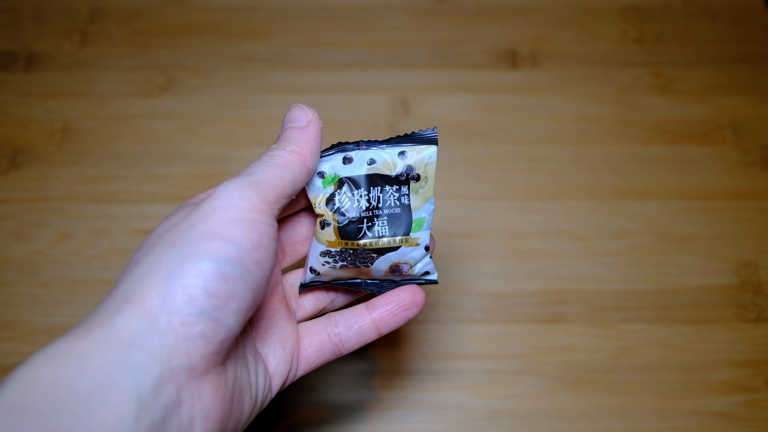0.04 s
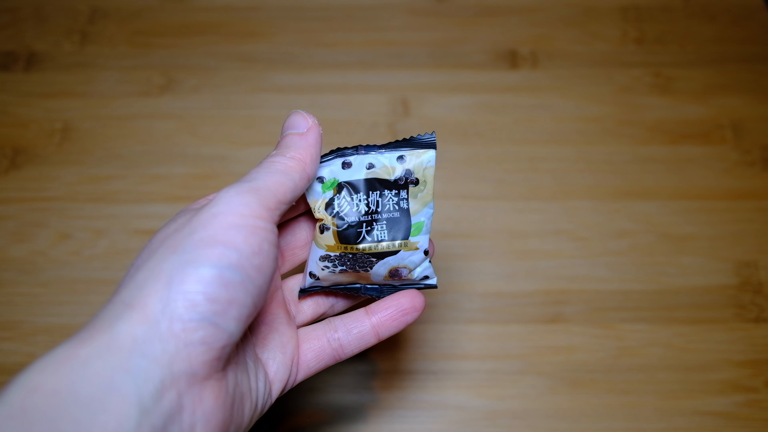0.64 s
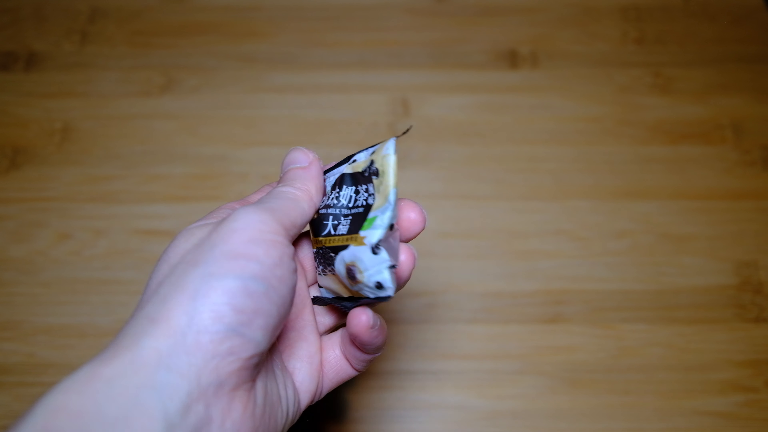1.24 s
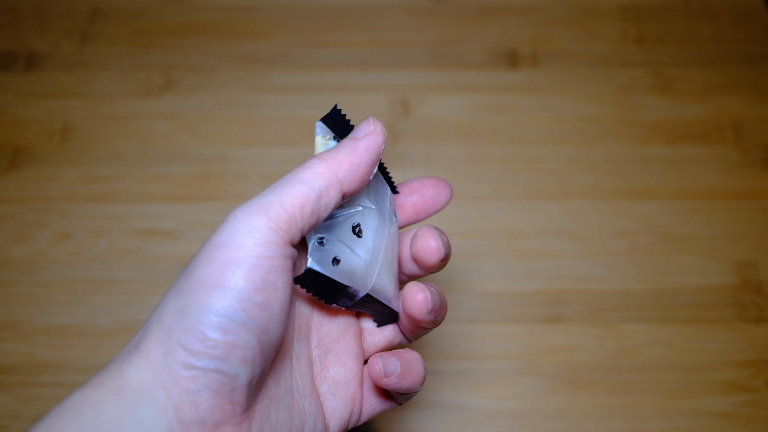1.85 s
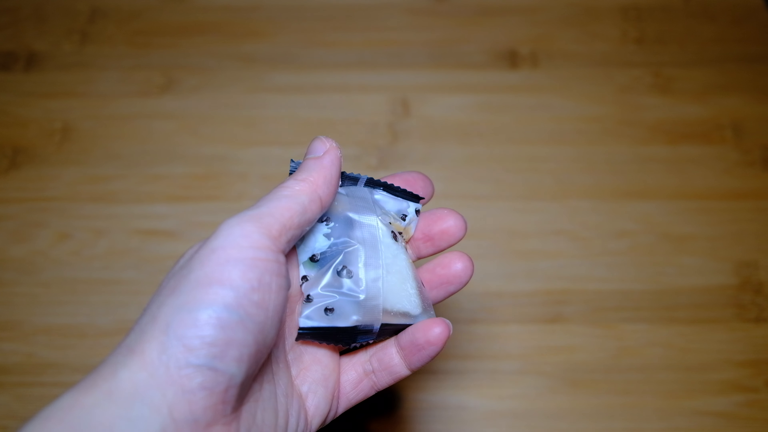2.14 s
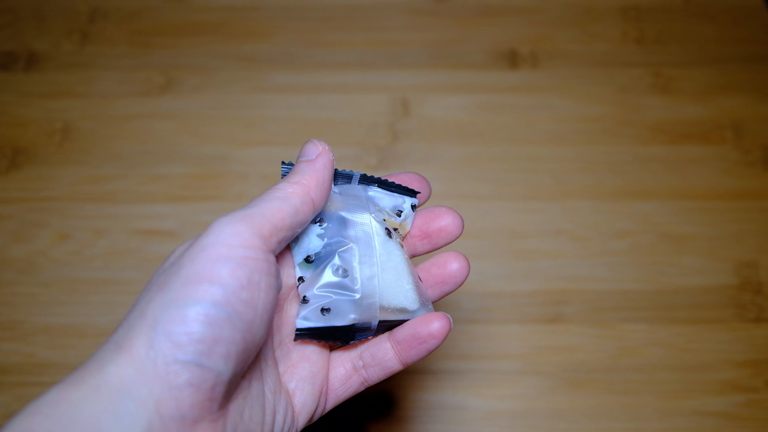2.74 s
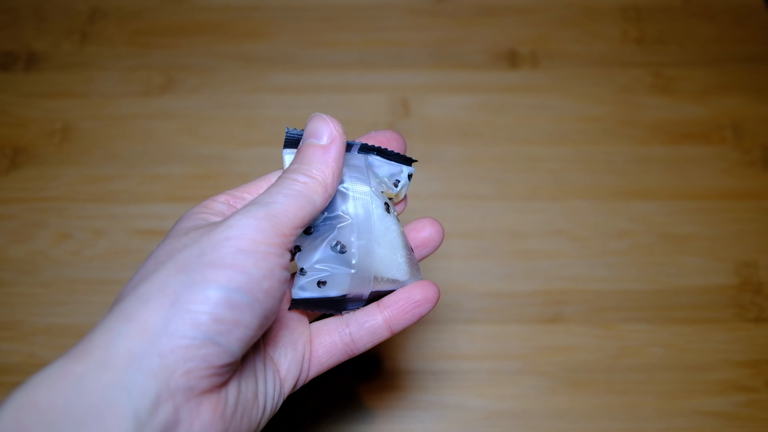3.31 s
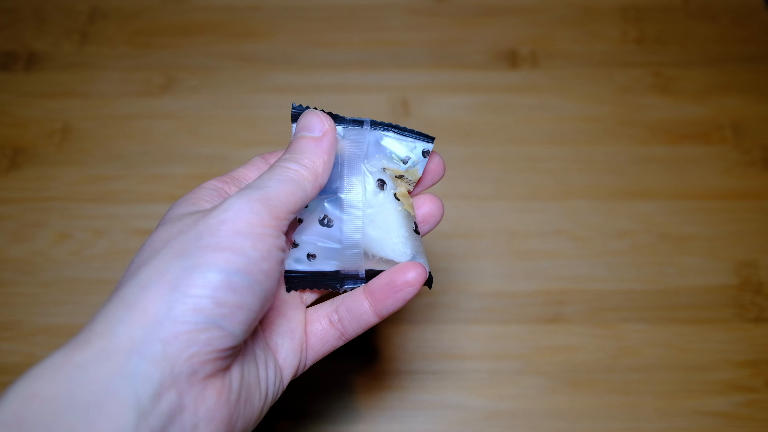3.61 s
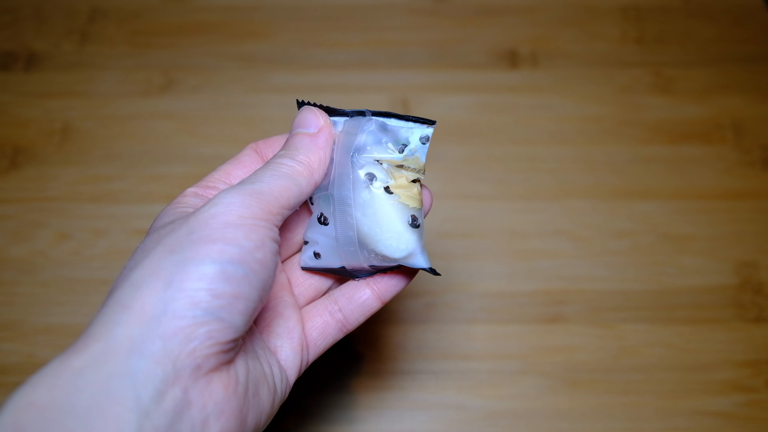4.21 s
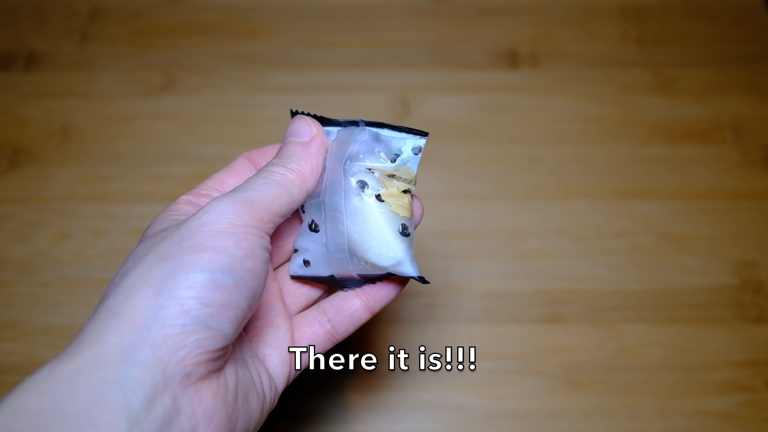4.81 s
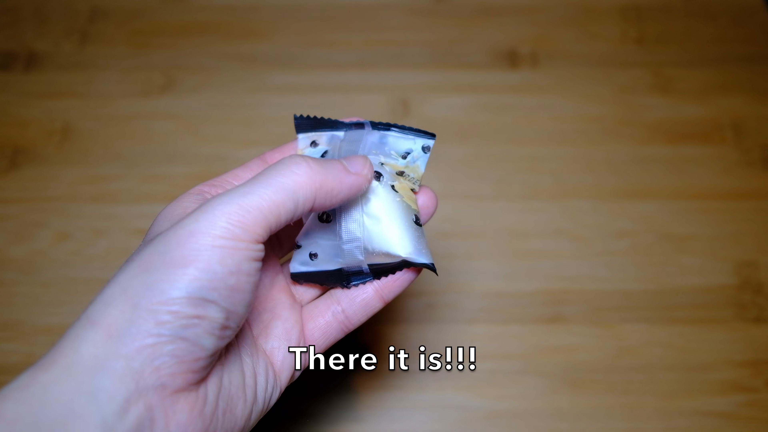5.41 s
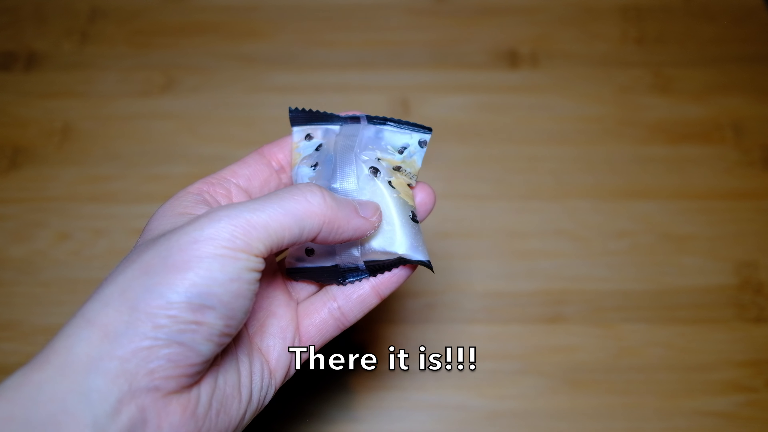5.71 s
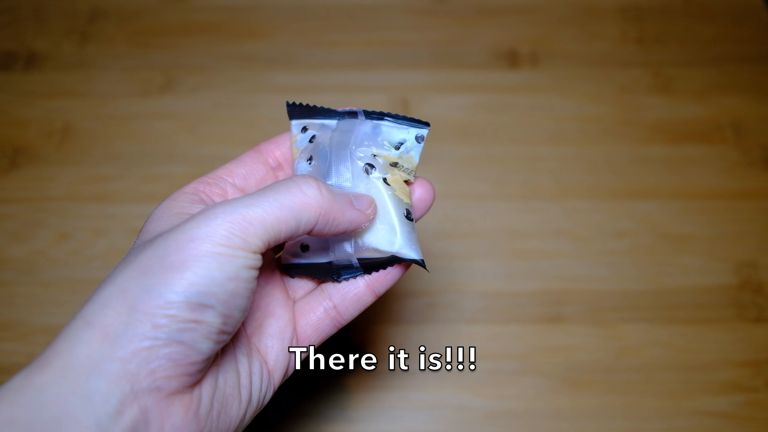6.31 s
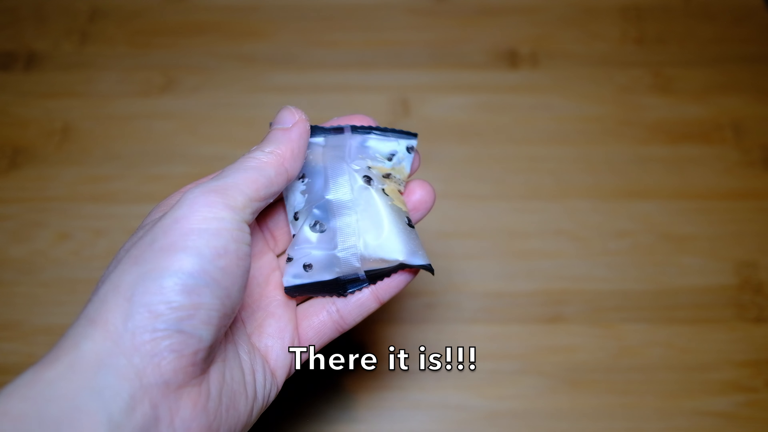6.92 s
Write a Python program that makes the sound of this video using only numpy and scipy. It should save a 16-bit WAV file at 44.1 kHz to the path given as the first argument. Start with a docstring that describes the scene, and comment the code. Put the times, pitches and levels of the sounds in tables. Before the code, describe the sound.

A small sealed plastic snack wrapper crackles and rustles in short spurts as a hand turns and presses it in a quiet room.

```python
"""A low hum and the faint noise of a small, quiet room; then, close to the microphone, plastic crackles.
A hand turns over a small sealed snack wrapper and presses it. Creases in the stiff film snap through
one by one, each briefly ringing a panel of film and the air-filled pouch. Squeezes set off runs of
smaller creases, finger strokes rustle over the film, and the near walls answer with short echoes."""
import sys
import numpy as np
from scipy import signal
from scipy.fft import rfft, irfft
from scipy.io import wavfile

SR = 44100
rng = np.random.default_rng(int(sys.argv[2]) if len(sys.argv) > 2 else 0)


def store_pcm(level_fs):
    """Save levels as 16-bit WAV."""
    pcm = np.round(np.clip(level_fs, -1, 1) * 32767).astype(np.int16)
    wavfile.write(sys.argv[1], SR, np.atleast_2d(pcm).T)


N = 315315
TIME = np.arange(N) / SR
SIDES = np.array([[1], [-1]])  # left, right

# Spectrum of the empty room's noise: frequency_hz, gain_db
ROOM_TONE = [(20, -14), (40, -14.5), (100, -5.5), (250, -3.5), (400, -5.5), (700, -11), (1300, -14.5),
             (2500, -23), (5000, -32), (10000, -40), (16000, -46)]
# Mains hum in the room: pitch_hz, level_db
MAINS_HUM = [(119.6, -66.5)]
# Wall echoes by band: frequency_hz, level_db, t60_s
ECHO_BANDS = [(150, -32, 0.72), (400, -10.5, 0.3), (820, -3, 0.53), (1390, -4.5, 0.34), (2740, -12, 0.42),
              (4300, -8, 0.27), (6040, -5.5, 0.3), (9100, -11.5, 0.24), (16000, -8, 0.15)]
# Side against mid for echoes reaching the microphone from all around: frequency_hz, side_db
ECHO_WIDTH = [(100, -2), (400, -18), (1000, -23), (2200, -18), (3200, -8.5), (4500, -4), (9000, 1.5)]
# Spectrum of skin sliding on film: frequency_hz, gain_db
RUSTLE_SPECTRUM = [(150, -11), (450, 1.5), (1200, 7), (2000, 4), (2900, 5), (4000, -6.5), (6000, -13.5),
                   (8000, -25), (10000, -27), (13000, -39.5), (16000, -43)]
# Finger strokes over the film: middle_s, length_s, level_db, brightness_db
FINGER_STROKES = [(0.859, 0.062, -47.5, 9.5), (0.963, 0.067, -44, 7.5), (1.054, 0.084, -42.5, 3),
                  (1.189, 0.061, -38, 1), (1.284, 0.084, -55.5, 14), (1.376, 0.025, -44.5, 5),
                  (1.441, 0.043, -42.5, 6), (1.552, 0.093, -56.5, -1), (1.768, 0.074, -50, -1),
                  (1.837, 0.088, -45, 8), (1.974, 0.19, -45.5, 11), (2.041, 0.019, -41.5, 10),
                  (2.123, 0.2, -49.5, 4.5), (3.128, 0.14, -48, 4), (3.362, .14, -49.5, 12),
                  (3.42, 0.039, -39.5, 4), (3.55, 0.18, -48, 3), (3.646, .07, -43.5, -4),
                  (3.779, .17, -42.5, 8.5), (5.098, 0.098, -54, -6), (5.154, 0.072, -44.5, 2),
                  (5.485, 0.037, -50, 5), (5.633, 0.024, -39, -3), (5.72, 0.25, -59, -3),
                  (6.344, 0.12, -49.5, -10), (6.674, 0.052, -39.5, -5), (6.86, 0.19, -57.5, 9.5),
                  (6.958, 0.062, -46.5, 1)]
# Squeezes of the pouch: start_s, length_s, level_db
POUCH_SQUEEZES = [(1.041, .01, -30), (2.21, .014, -26), (3.127, 0.0091, -28.5), (3.612, 0.026, -29),
                  (3.72, 0.011, -23), (3.808, 0.0086, -29), (3.828, 0.01, -29.5), (3.895, .01, -34),
                  (6.016, 0.024, -31), (6.128, .026, -29.5), (6.294, .045, -38.5), (6.473, 0.02, -29),
                  (6.668, 0.046, -32), (6.966, 0.011, -36), (7.031, .009, -39), (7.117, 0.014, -35)]
# Spectrum of a buckling crease: frequency_hz, gain_db
CRACK_SPECTRUM = [(60, -40), (300, -12), (1500, -5), (4200, 9.5), (5300, 12.5), (7000, 4.5), (8200, 0.5),
                  (10000, 1), (13000, -14.5), (16000, -29)]
# Colour of the panel and pouch ringing as heard close by: frequency_hz, gain_db
RING_COLOUR = [(100, -7), (400, 2.5), (750, -1.5), (1200, 3), (1600, -4.5), (1850, 4), (2200, -1),
               (3300, 1), (4150, -5), (5300, -0.5), (7000, -8.5), (12000, -2)]
# Single creases snapping: start_s, panel_db, panel_hz, panel_q, pouch_db, pouch_hz, crack_db
CREASE_SNAPS = [(0.7522, -29, 2850, 0.65, -38, 1440, -51), (0.9347, -34, 1970, 0.45, -58, 510, -44),
                (0.9832, -31, 1900, 1.9, -38.5, 594, -49), (1.0157, -17, 1910, 0.94, -25, 980, -38),
                (1.077, -26.5, 1880, 0.74, -30.5, 820, -56), (1.0967, -25, 2370, 1.8, -31.5, 960, -60),
                (1.1641, -18.5, 3380, 2, -27, 1050, -28.5), (1.264, -24.5, 1980, 1.35, -30.5, 736, -50),
                (1.8322, -31, 1530, 0.67, -38, 806, -62), (1.9765, -36, 2240, 1, -30, 1610, -60),
                (2.2374, -12.5, 2500, 1.85, -19, 870, -32.5), (2.2458, -20.5, 1760, 1.3, -28.5, 960, -54),
                (2.7855, -20.5, 2280, 0.7, -35, 1020, -31.5), (2.938, -19, 2300, 1.7, -20, 1000, -36.5),
                (2.9661, -31.5, 2030, 1.2, -40, 450, -66), (3.051, -31.5, 1940, 1.5, -56, 500, -51),
                (3.0746, -22.5, 2540, 2.5, -26.5, 990, -39), (3.1015, -23.5, 3020, 0.57, -37, 910, -35),
                (3.121, -28.5, 1810, 2.9, -29.5, 670, -44), (3.164, -24.5, 1940, 1.5, -23.5, 670, -34),
                (3.399, -18, 2110, 1.3, -43, 500, -25.5), (3.4474, -13, 2770, 3.4, -22, 690, -27),
                (3.4862, -27.5, 1610, 0.62, -31, 870, -36), (3.5113, -37, 4210, 1.6, -35.5, 1210, -54),
                (3.641, -22.5, 1930, 2.7, -35.5, 520, -39), (3.6717, -28.5, 1980, 2.6, -43, 600, -32.5),
                (3.7312, -25, 3130, 3, -23, 980, -44), (3.7558, -19, 2860, 1.14, -44, 497, -28),
                (3.766, -23, 1720, 5.4, -33, 1160, -51), (3.8406, -22.5, 3650, 0.67, -40, 1070, -31),
                (4.1026, -41, 2730, 0.83, -56, 500, -74), (4.188, -17, 3620, 2.1, -30, 1370, -25),
                (4.242, -18.5, 2460, 0.7, -27.5, 1200, -58), (4.4105, -28.5, 2630, 0.96, -34, 816, -53),
                (4.9157, -28, 2270, 0.9, -41.5, 1280, -59), (5.1502, -22, 2570, 0.75, -36.5, 1260, -45),
                (5.2412, -34, 3030, 2.2, -53, 500, -34), (5.2526, -20.5, 1800, 1.25, -25.5, 830, -44),
                (5.4938, -22.5, 2830, 3.6, -35.5, 1170, -34), (5.5168, -13, 1860, 0.8, -27, 1040, -59),
                (5.6373, -20.5, 2330, 1.6, -26, 805, -42), (5.681, -21, 3120, 3.8, -45, 534, -32.5),
                (5.7338, -29, 2900, 3.9, -36, 1070, -35.5), (5.7526, -25, 2600, 1.6, -24.5, 850, -43),
                (5.7776, -17.5, 2600, 2.8, -30, 810, -33), (5.7895, -12.5, 2310, 2.4, -25.5, 710, -25),
                (6.0439, -25, 2700, 1.6, -29, 776, -42), (6.1735, -22, 2610, 2, -40, 740, -57),
                (6.323, -27, 2400, 0.98, -48, 640, -37), (6.3393, -25.5, 1570, 0.87, -30, 610, -60),
                (6.358, -26, 2770, 2.3, -33, 835, -39.5), (6.4944, -20.5, 2490, 3.1, -35, 890, -37.5),
                (6.5354, -31.5, 2420, 1.5, -51, 630, -55), (6.656, -23.5, 2757, 0.55, -34.5, 714, -45),
                (6.6659, -22, 2150, 1.3, -33.5, 585, -57), (6.7497, -30, 2110, 0.56, -49, 655, -35.5),
                (6.7679, -27.5, 2700, 0.65, -52, 920, -64), (6.877, -30, 2610, .9, -59, 500, -67),
                (7.0006, -16, 2180, 1.4, -24.5, 587, -40), (7.1359, -27.5, 1807, 0.62, -38, 497, -74)]


def undb(db):
    """Decibels to gain."""
    return 10 ** (np.asarray(db) / 20)


def curve_at(points, hz):
    """Read (frequency_hz, value) points along a log frequency axis."""
    table = np.array(points, float)
    return np.interp(np.log(np.maximum(hz, 1)), np.log(table[:, 0]), table[:, 1])


def colour(x, spectrum):
    """Filter by a (frequency_hz, gain_db) spectrum."""
    size = x.shape[-1]
    return irfft(rfft(x) * undb(curve_at(spectrum, np.fft.rfftfreq(size, 1 / SR))), size)


def unit_rms(x):
    """Scale to rms 1."""
    return x / np.sqrt(np.mean(x ** 2))


def unit_pulse(x):
    """Scale to the energy of one millisecond at rms 1."""
    return x / np.sqrt(np.sum(x ** 2) / (SR / 1000))


def add(track, start_s, x):
    """Mix a short sound into the track."""
    i = int(start_s * SR)
    track[i:i + len(x)] += x[:max(len(track) - i, 0)]


def room_tone(noise_db=-56, side_db=-3, waver=0.17):
    """Steady low room noise around the microphone and a slightly wavering mains hum."""
    mid, side = (unit_rms(colour(rng.standard_normal(N), ROOM_TONE)) for _ in range(2))
    drift = np.interp(TIME, np.linspace(0, TIME[-1], num=40), rng.standard_normal(40))
    hum = sum(undb(db) * np.sqrt(2) * np.sin(2 * np.pi * hz * TIME) for hz, db in MAINS_HUM)
    return undb(noise_db) * (mid + undb(side_db) * SIDES * side) + hum * (1 + waver * drift)


def room_response(build_s=0.0017, early_db=6, early_s=0.027, size=16384):
    """Echoes from near walls build up, then a short tail dulls as it fades."""
    t, hz = np.arange(size) / SR, np.fft.rfftfreq(size, 1 / SR)
    noise, tail = rfft(rng.standard_normal((2, size))), 0
    centres_hz = np.array(ECHO_BANDS)[:, 0]
    for (_, db, t60_s), share in zip(ECHO_BANDS, np.eye(len(ECHO_BANDS))):
        band = irfft(noise * curve_at(np.c_[centres_hz, share], hz), size)
        fade = (1 - np.exp(-t / build_s)) * undb(-60 * t / t60_s + early_db * np.exp(-t / early_s))
        tail = tail + undb(db) * band * fade / np.sqrt(np.sum(fade ** 2))
    mid, side = tail
    return mid + SIDES * colour(side, ECHO_WIDTH)


def wall_echoes(sound, patterns=4, turn_s=0.04):
    """The turning, bending wrapper radiates in new directions: one echo pattern fades into the next."""
    out = 0
    for k in range(patterns):
        share = np.maximum(1 - np.abs((TIME / turn_s - k) % patterns - 1), 0)
        sent = sound * np.sqrt(share)
        out = out + signal.oaconvolve(sent[None], room_response(), axes=1)[:, :N]
    return out


def finger_strokes(times, edge_db=7, shape=1.86):
    """Level and brightness of the sliding in dB: each stroke swells and fades, edge_db down at its ends."""
    middle_s, length_s, db, bright_db = np.transpose(FINGER_STROKES)[:, :, None]
    power = undb(db - edge_db * np.abs(2 * (times - middle_s) / length_s) ** shape) ** 2
    total = power.sum(0) + 1e-12
    return 10 * np.log10(total), (power * bright_db).sum(0) / total


def finger_rustle(grips_per_s=130, grip_db=2, slips_per_s=5500, spread_db=3.5,
                  hiss_db=-3, bright_hz=4000, gain_db=-2):
    """Skin drags on the film in countless tiny, uneven slips; each stroke has its own brightness."""
    grid_s = TIME[::64]
    slide_db, bright_db = (np.interp(TIME, grid_s, curve) for curve in finger_strokes(grid_s))
    sizes = undb(spread_db * np.minimum(rng.exponential(size=N), 5))
    slips = (rng.random(N) < slips_per_s / SR) * sizes * rng.choice([-1, 1], N)
    friction = unit_rms(slips) + undb(hiss_db) * rng.standard_normal(N)
    film = unit_rms(colour(friction, RUSTLE_SPECTRUM))
    treble = signal.sosfiltfilt(signal.butter(2, bright_hz, "high", fs=SR, output="sos"), film)
    # the skin catches and lets go
    grip = np.interp(TIME * grips_per_s, np.arange(len(grid_s)), rng.standard_normal(len(grid_s)))
    return undb(slide_db + gain_db + grip_db * grip) * (film + (undb(bright_db) - 1) * treble)


def ring(pitch_hz, q, soft_hz=5500, size=1024):
    """A heavily damped mode of film or pouch: it swells for a cycle and dies in a few more."""
    hz = np.fft.rfftfreq(size, 1 / SR) + 1
    mode = (1 + 1j * max(q, 0.5) * (hz / pitch_hz - pitch_hz / hz)) ** -2
    return unit_pulse(irfft(mode / (1 + 1j * hz / soft_hz) ** 2))


def crinkles(above_stroke_db=4, spread_db=2.5, centre_hz=1950, octaves=0.42, q=2.8, count=400):
    """Tiny creases tick at random while the film slides."""
    out, times = np.zeros(N), rng.uniform(0, TIME[-1], count)
    scatter = np.clip(rng.standard_normal((count, 2)), -2, 2)
    stroke_db, _ = finger_strokes(times)
    for start_s, db, (loud, pitch) in zip(times, stroke_db, scatter):
        tick = ring(centre_hz * 2 ** (octaves * pitch), q)
        add(out, start_s, undb(db + above_stroke_db + spread_db * loud) * tick)
    return out


def pouch_bumps(pitch_hz=389, q=1.56, gain_db=-10.5, slack_hz=680, db_per_octave=21):
    """The whole pouch flexes under a snap with a hollow bump; the slacker (lower), the more it gives."""
    out, bump = np.zeros(N), ring(pitch_hz, q)
    for start_s, _, _, _, pouch_db, pouch_hz, _ in CREASE_SNAPS:
        slack_db = -db_per_octave * np.log2(pouch_hz / slack_hz)
        add(out, start_s, undb(pouch_db + gain_db + slack_db) * bump)
    return out


def squeezed_creases(gap_s=0.0095, spread_db=2, panel_hz=2150, q=1.25, pouch_hz=850, octaves=0.39,
                     pouch_offset_db=-6, crack_offset_db=-19, most=10):
    """Under a squeeze small creases give way at uneven gaps and pitches; rows as in CREASE_SNAPS."""
    creases, shape = [], (len(POUCH_SQUEEZES), most)
    scatters = np.clip(rng.standard_normal((*shape, 4)), -2, 2)
    for (start_s, length_s, db), scatter, delays in zip(POUCH_SQUEEZES, scatters, rng.random(shape)):
        count = int(np.clip(round(length_s / gap_s), 1, most))
        for k, (loud, panel, pouch, crack) in enumerate(scatter[:count]):
            panel_db = db + spread_db * loud
            creases.append((start_s + length_s * (k + delays[k]) / count,
                            panel_db, panel_hz * 2 ** (octaves * panel), q,
                            panel_db + pouch_offset_db, pouch_hz * 2 ** (octaves * pouch),
                            panel_db + crack_offset_db + 2 * spread_db * crack))
    return creases


def snaps_to_walls(creases, panel_q=1.0, pouch_q=0.96, ring_db=-1.3, size=1024):
    """The snaps as the walls receive them, from all sides of the wrapper: broad and hardly pitched."""
    out = np.zeros(N)
    click = unit_pulse(colour(signal.unit_impulse(size, "mid"), CRACK_SPECTRUM))
    for start_s, panel_db, panel_hz, _, pouch_db, pouch_hz, crack_db in creases:
        tone = undb(panel_db) * ring(panel_hz, panel_q) + undb(pouch_db) * ring(pouch_hz, pouch_q)
        add(out, start_s, undb(ring_db) * tone)
        add(out, start_s - size / 2 / SR, undb(crack_db) * click)
    return out


def film_flutter(tone, paths, flutter_db, decay_s=0.00098):
    """Bending waves bounce between the folds for a few milliseconds, smearing a tone at equal energy."""
    t = np.arange(len(paths)) / SR
    bounces = paths * (1 - np.exp(-t / decay_s)) * np.exp(-t / decay_s)
    response = (t == 0) + undb(flutter_db) * bounces / np.sqrt(np.sum(bounces ** 2))
    ragged = signal.fftconvolve(tone, response)
    return ragged * np.sqrt(np.sum(tone ** 2) / np.sum(ragged ** 2))


def close_snaps(creases, pouch_q=1.13, rise_s=0.0001, decay_s=0.0006, size=1024):
    """At the microphone: each crease buckles with a crack, kicking a panel and the air in the pouch."""
    rings, cracks, t = np.zeros(N), np.zeros(N), np.arange(size) / SR
    buckle = (1 - np.exp(-t / rise_s)) * np.exp(-t / decay_s)
    for start_s, panel_db, panel_hz, panel_q, pouch_db, pouch_hz, crack_db in creases:
        noise, paths = rng.standard_normal((2, size))
        crack = unit_pulse(colour(np.roll(noise * buckle, size // 2), CRACK_SPECTRUM))
        add(cracks, start_s - size / 2 / SR, undb(crack_db) * crack)
        tone = undb(panel_db) * ring(panel_hz, panel_q) + undb(pouch_db) * ring(pouch_hz, pouch_q)
        # weak snaps give way raggedly, strong ones let go at once
        flutter_db = np.interp(panel_db, [-32, -16], [-1, -6])
        add(rings, start_s, film_flutter(tone, paths, flutter_db))
    return colour(rings, RING_COLOUR) + cracks


def scene(lean_left_db=0.67):
    """The wrapper is held close, almost straight ahead of the microphone, with the room around it."""
    background = room_tone()
    handling = pouch_bumps() + crinkles() + finger_rustle()
    creases = CREASE_SNAPS + squeezed_creases()
    echoes = wall_echoes(handling + snaps_to_walls(creases))
    direct = handling + close_snaps(creases)
    return direct * undb(SIDES * lean_left_db / 2) + echoes + background


def record(dry, top_hz=16300):
    """The recorder cuts the highest treble steeply."""
    return signal.sosfilt(signal.ellip(8, 0.2, 70, top_hz, fs=SR, output="sos"), dry)


dry = scene()
out = record(dry)
store_pcm(out)
```